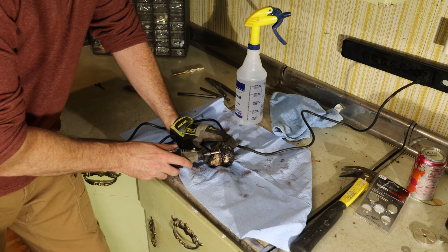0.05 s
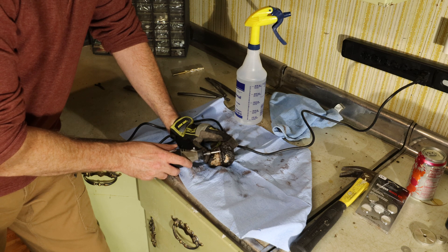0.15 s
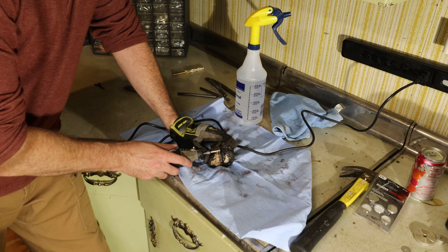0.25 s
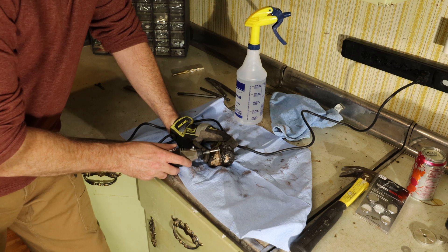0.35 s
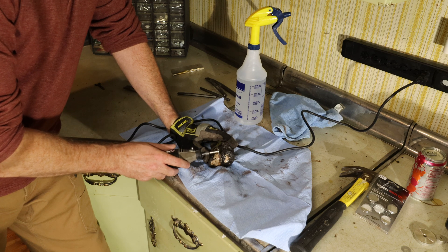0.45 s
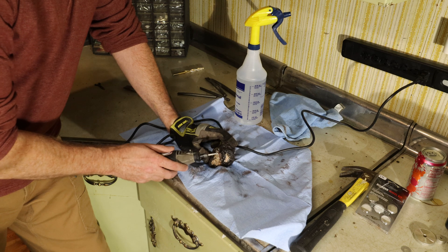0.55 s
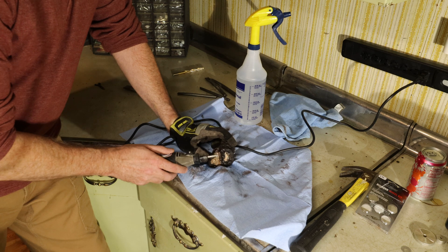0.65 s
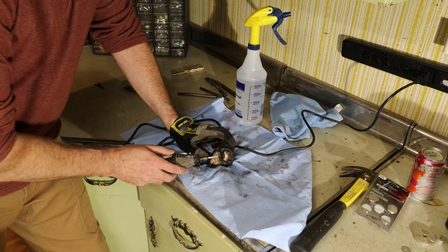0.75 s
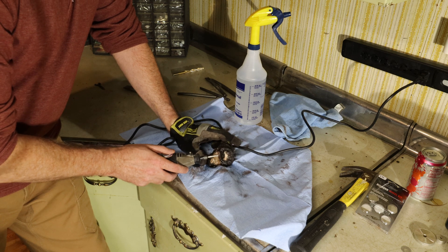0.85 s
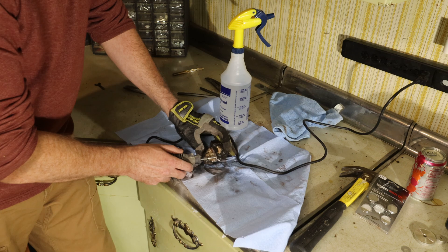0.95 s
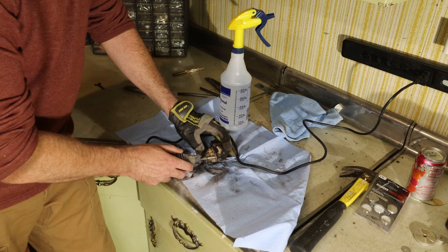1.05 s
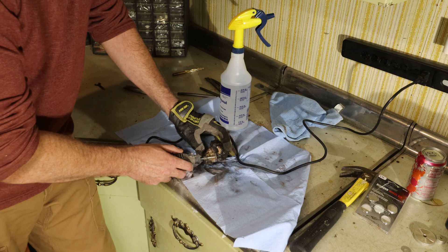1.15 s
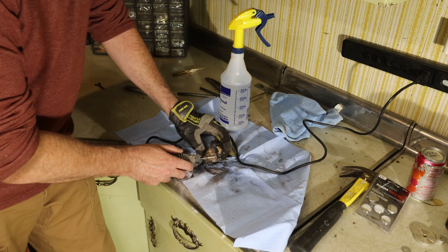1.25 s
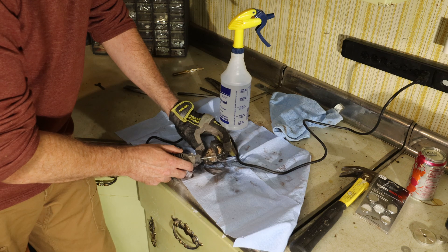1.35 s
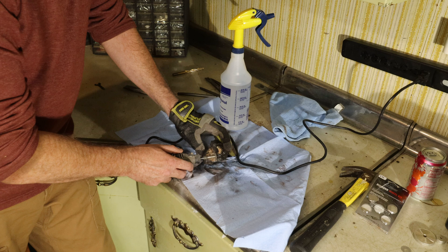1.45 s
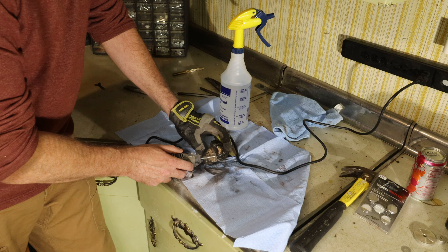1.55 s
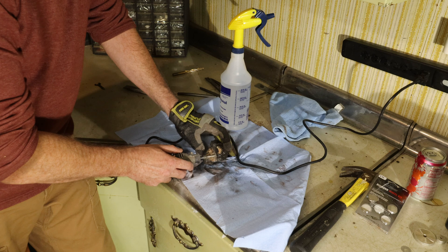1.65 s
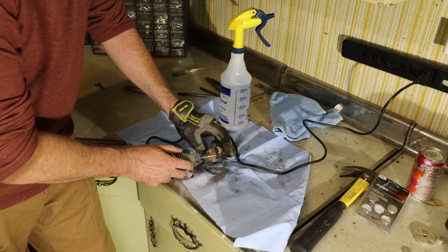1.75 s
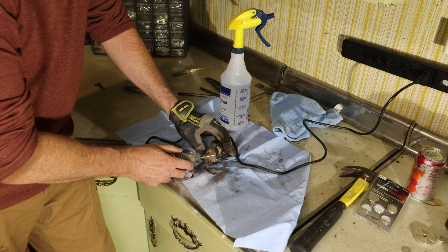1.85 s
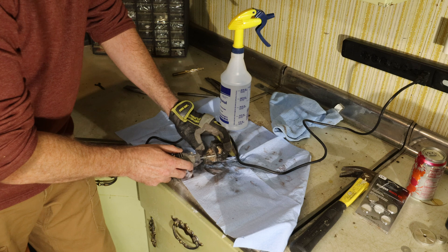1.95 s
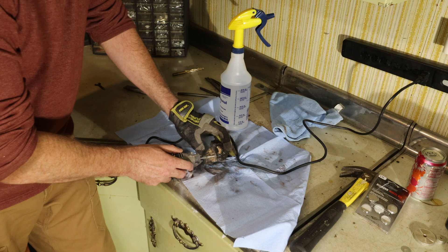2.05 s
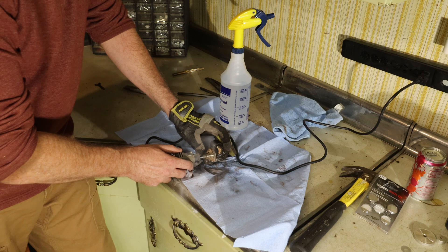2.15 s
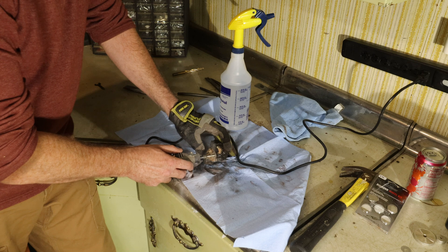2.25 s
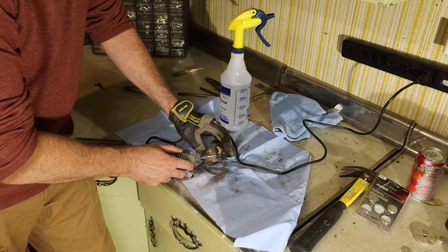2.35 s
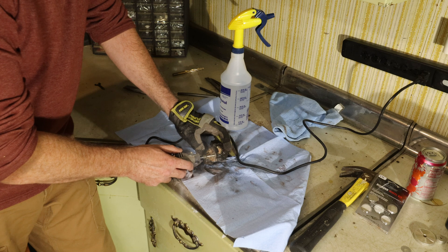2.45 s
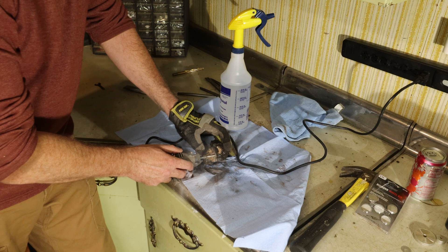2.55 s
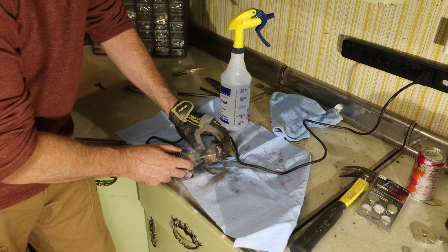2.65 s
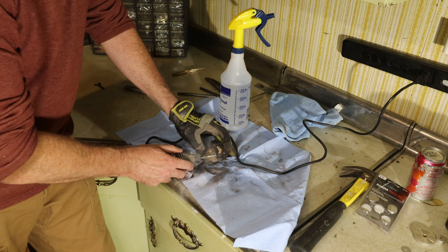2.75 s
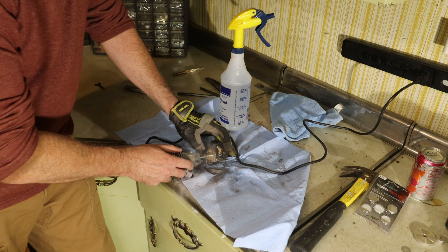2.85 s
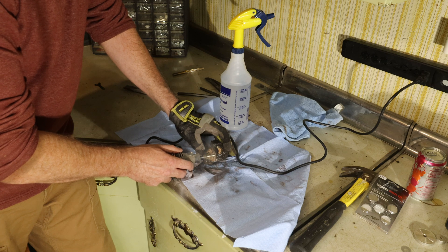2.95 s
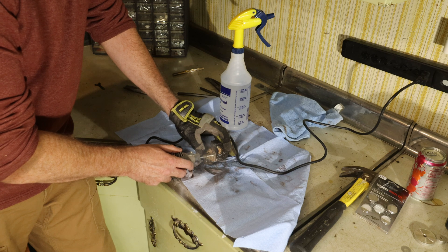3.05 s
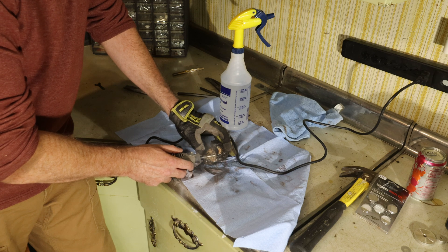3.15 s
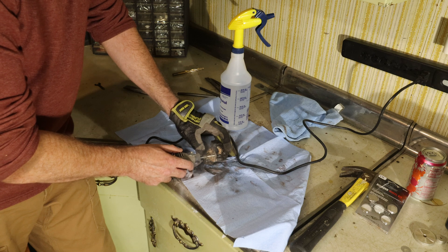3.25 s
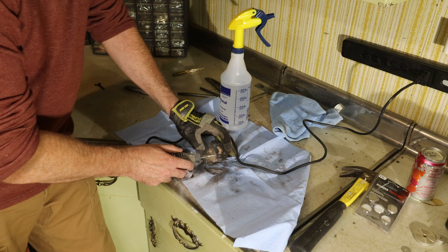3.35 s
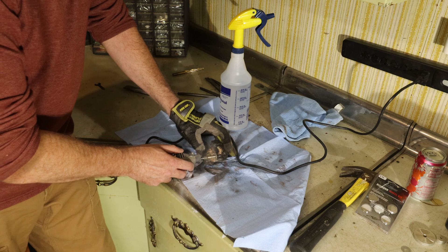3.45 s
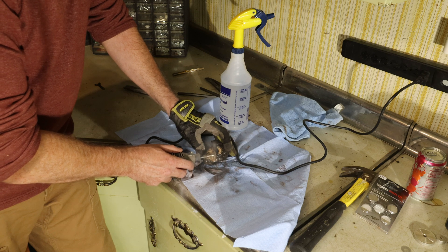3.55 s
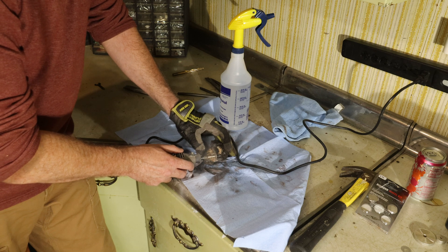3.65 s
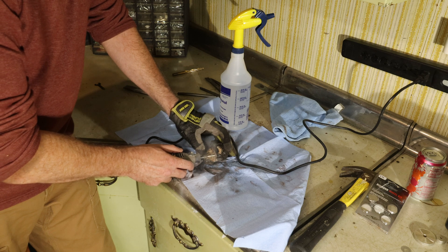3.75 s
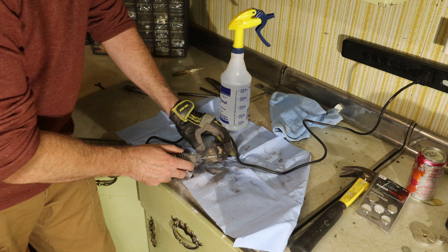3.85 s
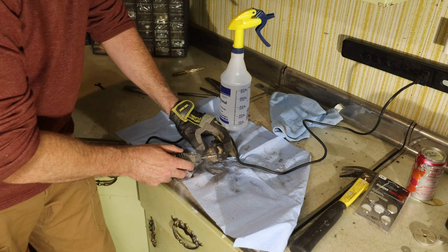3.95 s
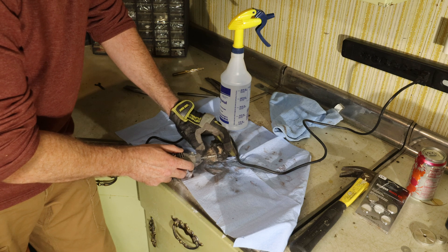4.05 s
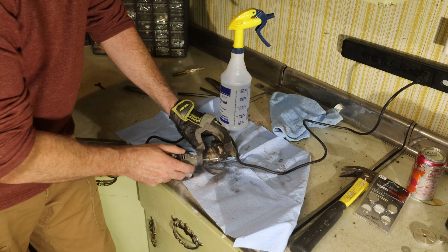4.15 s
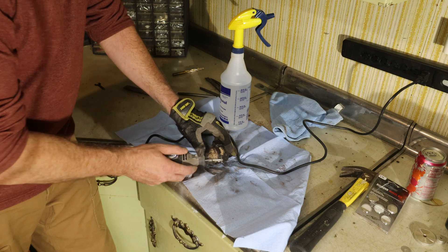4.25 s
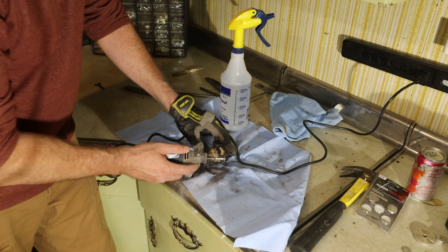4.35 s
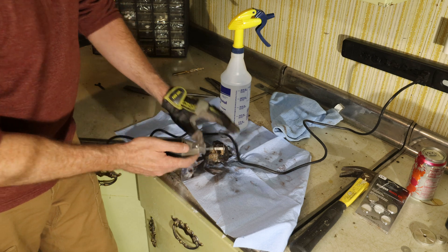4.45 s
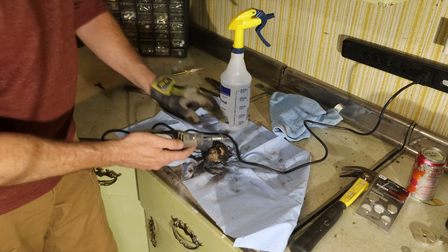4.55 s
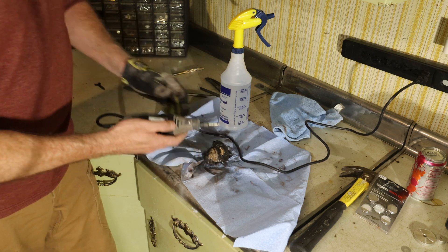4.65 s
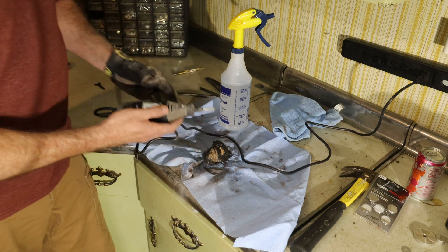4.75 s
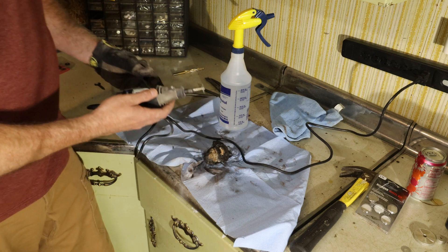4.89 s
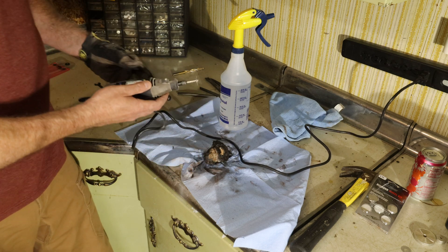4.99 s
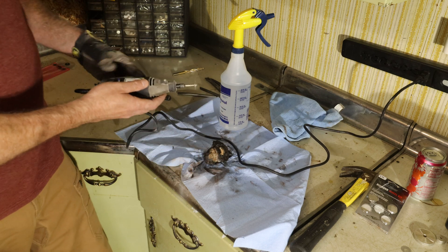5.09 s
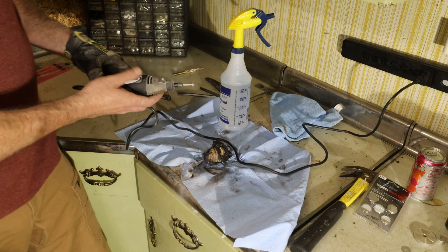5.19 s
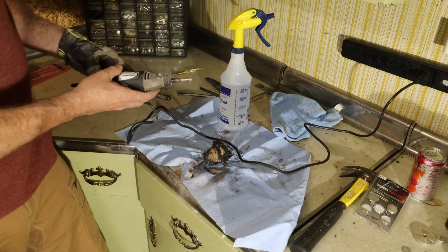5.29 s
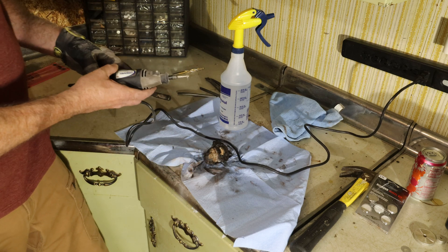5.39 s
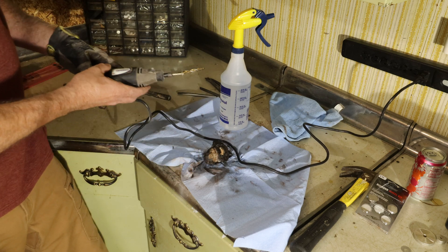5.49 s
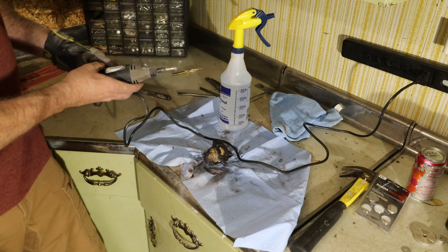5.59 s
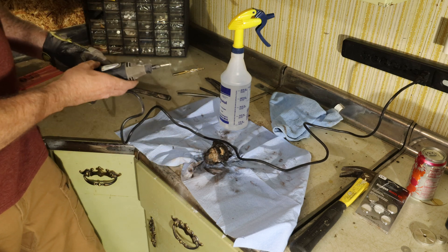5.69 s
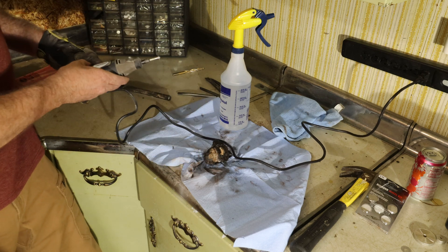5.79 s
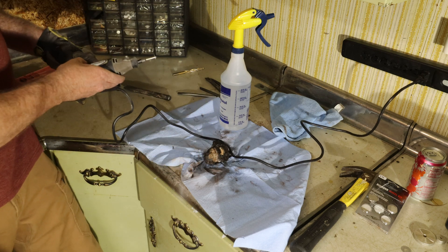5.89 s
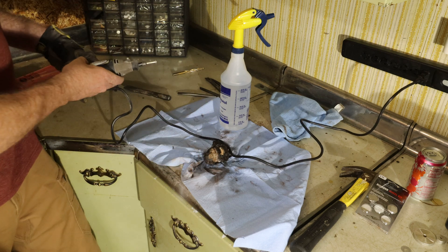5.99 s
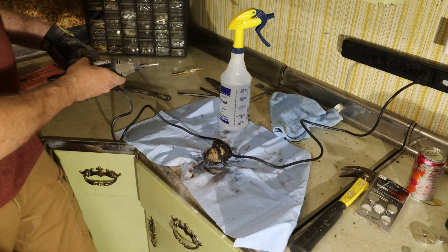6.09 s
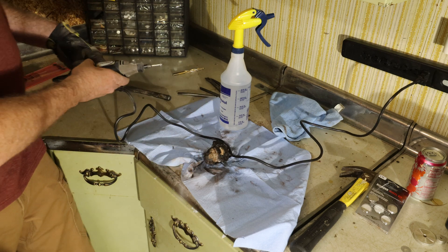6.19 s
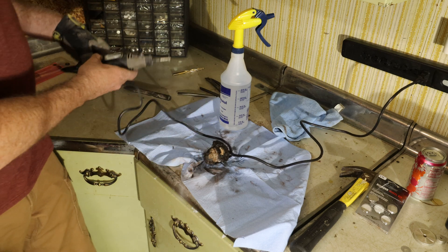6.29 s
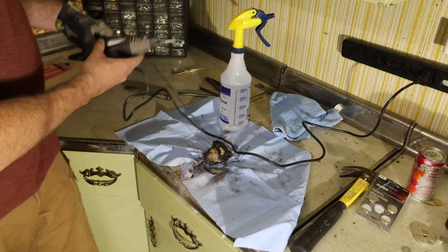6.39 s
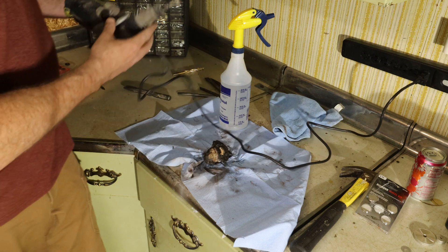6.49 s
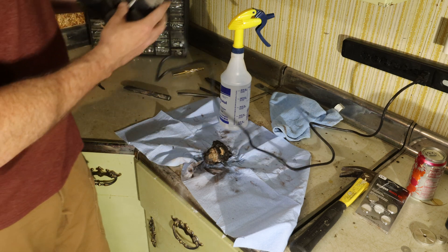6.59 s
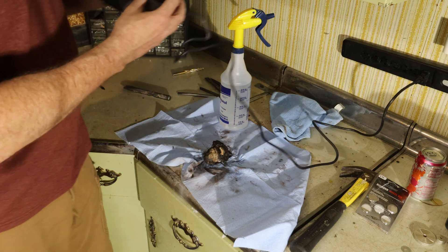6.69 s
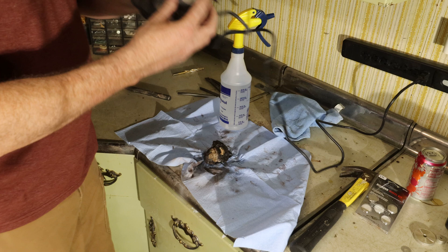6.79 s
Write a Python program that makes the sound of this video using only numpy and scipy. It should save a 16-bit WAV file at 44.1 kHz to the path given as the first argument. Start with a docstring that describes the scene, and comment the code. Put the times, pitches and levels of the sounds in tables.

```python
"""A small diamond wheel buzzes and grinds on stone, first in a shallow cut, then, past a short silence, in a long one.
Its high spot rubs once a turn, its diamonds scratch off gritty noise, and now and then it cracks or chatters.
The handheld mains-powered tool hums and whistles at multiples of its shaft speed, which sags under the load.
Lifted clear, it speeds up and rattles with fan and brush noise, then is switched off and coasts down in pitch."""
import sys
import numpy as np
from scipy import signal
from scipy.fft import rfft, irfft, next_fast_len
from scipy.io import wavfile
from scipy.ndimage import uniform_filter1d, map_coordinates

SR = 44100
rng = np.random.default_rng(int(sys.argv[2]) if len(sys.argv) > 2 else 0)


def materialize(psi):
    """Save the field psi as 16-bit PCM at rate SR to the path in sys.argv[1].

    A 1-D psi becomes a single channel; in a 2-D psi each row is a channel.
    """
    bounded = np.clip(np.atleast_2d(psi).T, -1, 1)
    quanta = np.round(bounded * 32767).astype(np.int16)
    wavfile.write(sys.argv[1], SR, quanta)


N = 301198
TIME = np.arange(N) / SR  # seconds
MAINS_HZ = 60
IDLE_HZ = 511.3  # free-running speed after the long cut, turns per second
OFF_S = 6.018  # the motor is switched off
# Wheel on stone in the long cut, levels before trims: start_s [s], rub_db, grind_db, dust_db, hum_db [dB]
LONG_CUT = [(1.05, -20.5, -28.5, -28.5, -39), (1.3, -16, -25.5, -25, -22), (1.5, -18, -26, -25.5, -27.5),
            (2.05, -19.5, -29, -29.5, -26), (2.5, -16, -25.5, -26.5, -24.5), (2.95, -17.5, -27, -28.5, -25),
            (3.35, -19.5, -28, -29, -24), (3.8, -21.5, -24, -29.5, -19), (4.1, -18, -25.5, -29, -22),
            (4.18, -19, -30, -35, -28.5)]
# The wheel bounces on every second turn: start_s [s], end_s [s], level_db [dB]
BOUNCES = [(3.053, 3.13, -29), (3.183, 3.295, -25), (3.412, 3.515, -25), (3.583, 3.686, -27.5),
           (3.797, 3.88, -29), (4.011, 4.1, -29)]
# The short silence: silent_from_s, silent_until_s, full_level_s [s]
DROPOUT = (.94, .977, .988)
# The lifted tool turns towards the listener and away; the end rows hold outside these times:
# time_s [s], hiss_change_db, rattle_change_db, drone_change_db [dB]
TURNING = [(4.2, -1.5, -3.5, -1), (4.8, 1, 0, 0), (5.25, 4, 1.5, 0), (5.6, 1.5, .3, 0.5),
           (5.8, -1.5, -3.5, 2), (6.1, -2.5, -2.5, -10)]


def amp(db):
    """Turn decibels into a gain."""
    return 10 ** (np.asarray(db) / 20)


def unit(x):
    """Scale to an average strength (rms) of 1."""
    return x / np.sqrt(np.mean(x ** 2) + 1e-20)


def along(points, hz):
    """Read a level in dB from (Hz, dB) points, evenly spaced in pitch."""
    point_hz, point_db = np.transpose(points)
    return np.interp(np.log(hz + 1), np.log(point_hz), point_db)


def curves(rows):
    """Join the rows of a table by straight lines into one curve for each column after the time."""
    time_s, *columns = np.transpose(rows)
    return [np.interp(TIME, time_s, column) for column in columns]


def wobble(rate):
    """A smooth random curve through rate random points a second."""
    coarse = TIME[::32]
    points = rng.standard_normal(int(TIME[-1] * rate) + 4)
    return np.interp(TIME, coarse, map_coordinates(points, [coarse * rate]))


def during(start, end, fade):
    """1 between two times, with sloping edges; full from the outset if it starts at 0."""
    rise = (TIME - start) / fade + .5 if start > fade else 1
    fall = (end - TIME) / fade + .5
    return np.clip(np.minimum(rise, fall), 0, 1)


def filtered(x, response):
    """Pass x through a gain that depends on frequency."""
    length = next_fast_len(N + SR // 4)
    gain = response(np.fft.rfftfreq(length, 1 / SR))
    return irfft(rfft(x, length) * gain, length)[:N]


def noise(colour, drive=1, patchy_db=0):
    """Coloured noise of rms 1, pulsed by drive, with patches in time and pitch that are stronger or weaker."""
    spectrum = signal.stft(drive * rng.standard_normal(N), nperseg=1024)[2]
    patches = uniform_filter1d(rng.standard_normal(spectrum.shape), size=5, axis=0)
    patches = uniform_filter1d(patches, size=9, axis=1)
    patchy = signal.istft(spectrum * amp(patchy_db * unit(patches)), nperseg=1024)[1][:N]
    return unit(filtered(patchy, lambda hz: amp(along(colour, hz))))


def recurring(x, speed, share):
    """The same diamonds pass again one and two turns later, gathering their noise around the shaft orders."""
    def earlier(turns):
        return map_coordinates(x, [np.arange(N) - turns * SR / speed])
    return unit(x + share * earlier(1) + share * share * earlier(2))


def mains_throb(depth):
    """The motor's torque pulses twice in each mains cycle."""
    return (1 + depth * np.cos(4 * np.pi * MAINS_HZ * TIME)) / np.sqrt(1 + depth ** 2 / 2)


def partial(angle, order, waver_db, rough, flutter=0):
    """One shaft order (a tone at order times the shaft speed), its phase fluttered by the torque pulses."""
    start, lag = rng.uniform(0, 2 * np.pi, 2)
    torque = np.cos(4 * np.pi * MAINS_HZ * TIME + lag)
    phase = order * angle + start + rough * wobble(70) + flutter * torque
    return np.sqrt(2) * amp(waver_db * wobble(24)) * np.sin(phase)


def buzz(speed, angle, colour, boost, waver_db, drift_db, rough, flutter, count):
    """One contact a turn: shaft orders slide under a fixed colour and flare up as they cross a resonance."""
    stack = np.zeros(N)
    for k in range(2, count):
        has_own_voice = k in (4, 6, 18)
        below_colour = k * speed.max() < colour[0][0]
        if has_own_voice or below_colour:
            continue
        level_db = along(colour, k * speed) + boost(k * speed) + drift_db * wobble(3.967)
        reach = min(k / 6, 1.3)  # a shake of the shaft moves high orders more than low ones
        stack += amp(level_db) * partial(angle, k, waver_db, rough * reach, flutter * reach)
    return unit(stack)


def resonance(modes, hz):
    """Boost in dB that a tone gets as it slides past each resonance."""
    coarse_hz = hz[::32]
    boost_db = sum(db * np.exp(-((coarse_hz - centre) / width) ** 2) for centre, width, db in modes)
    return np.interp(TIME, TIME[::32], boost_db)


def pressed_boost(hz):
    """Resonance of the wheel in the stone, in dB, shifting as the groove deepens."""
    # In the long cut: pitch_hz [Hz], half_width_hz [Hz], boost_at_start_db [dB], boost_at_end_db [dB]
    long_modes = np.array([(1215, 30, 5, 3.5), (1400, 64, 7, 0), (1627, 68, 10, 7), (1932, 55, 10.5, 0),
                           (2023, 31, 5, 7), (2180, 70, 2, 13), (2425, 55, 9, 10), (2550, 68, 18, 10),
                           (2900, 110, 7, 8), (2840, 45, 7, 4), (3554, 50, 10, 12), (4260, 130, 14, 3),
                           (4840, 20, 13, 1), (5750, 150, 6, 5), (7105, 140, 9, 5), (7750, 120, 10, 5)])
    # In the first, shallow cut: pitch_hz [Hz], half_width_hz [Hz], boost_db [dB]
    shallow_modes = [(847.5, 7.6, 10), (1678, 27, 17), (2086, 45, 11.5), (4180, 140, 15), (5830, 40, 17)]
    depth = np.interp(TIME, [LONG_CUT[0][0], LONG_CUT[-1][0]], [0, 1])
    entering = resonance(long_modes[:, [0, 1, 2]], hz)
    sunk = resonance(long_modes[:, [0, 1, 3]], hz)
    return np.where(TIME < DROPOUT[0], resonance(shallow_modes, hz), entering + depth * (sunk - entering))


def free_boost(hz):
    """Resonance of the tool in the air, in dB."""
    # pitch_hz [Hz], half_width_hz [Hz], boost_db [dB]
    free_modes = [(498.7, 12, 10.5), (985, 12, 5), (1015, 11, 8), (1913, 18, 9.5), (2006, 14, 9.5),
                  (2035, 9.4, 14.5), (2421, 38, 7.5), (2526, 13, 5.5), (3048, 10, 5), (3510, 22, 7),
                  (4490, 35, 7), (4570, 20, 4), (4060, 16, 3), (5075, 17, 3), (5550, 28, 10)]
    return resonance(free_modes, hz)


def switched_off():
    """0 while the motor is powered, rising to 1 within 0.18 s once the current is cut."""
    return np.clip((TIME - OFF_S) / .18, 0, 1)


def shaft_speed():
    """Turns per second: held down in each cut, recovering after it, and slowed evenly by friction once off."""
    # Speed in each cut: time_s [s], speed_hz [turns per second]
    first_speed = [(0, 416), (.22, 419), (.44, 425.4)]
    long_speed = [(0.98, 485.2), (1.18, 483.6), (1.55, 438.3), (1.9, 426.1), (1.98, 425.4), (2.14, 430.6),
                  (2.56, 406.7), (2.68, 414.0), (2.79, 399.1), (2.92, 408.6), (3.04, 399.1), (3.11, 406.7),
                  (3.23, 403.0), (3.37, 413.2), (3.42, 411.4), (3.59, 421.8), (3.73, 420.2), (3.8, 428.8),
                  (3.87, 424.5), (4.16, 443.9)]
    first_idle_hz, recover_s, brake_hz_per_s = 469.7, .46, 338

    def cut_and_lift(cut, idle_hz):
        lifted_s = np.maximum(TIME - cut[-1][0], 0)
        return idle_hz + (curves(cut)[0] - idle_hz) * np.exp(-lifted_s / recover_s)
    before_silence = cut_and_lift(first_speed, first_idle_hz)
    after_silence = cut_and_lift(long_speed, IDLE_HZ)
    powered = np.where(TIME < DROPOUT[1], before_silence, after_silence)
    return powered - brake_hz_per_s * np.maximum(TIME - OFF_S, 0)


def contact(first, second):
    """Gains of rubbing, grinding, dust and hum while the wheel touches the stone."""
    # The shallow cut, levels before trims: time_s [s], rub_db, grind_db, dust_db, hum_db [dB]
    first_cut = [(0, -24.5, -22, -29.5, -33.5), (.2, -23.5, -24, -29.5, -29.5), (.29, -22.5, -26, -30, -28),
                 (.315, -27, -22, -30, -38), (.35, -26, -17, -29, -41), (.385, -29, -24, -30, -40),
                 (.44, -27, -21, -27, -42)]
    return [first * amp(a) + second * amp(b) for a, b in zip(curves(first_cut), curves(LONG_CUT))]


def rattling(speed, load):
    """Gain of the spindle rattle: it grows steeply near idle speed and is damped by the cut."""
    # 0.25 dB is lost for every turn per second below idle, down to a floor
    free_db = np.maximum(-13.5 - 0.25 * (IDLE_HZ - speed), -29)
    return amp(free_db - 8.8 * load - 7.5 * switched_off())


def cutting(speed, angle, first, second):
    """The wheel's high spot rubs each turn and its diamonds scratch off grit, more with each push or bounce."""
    # Colours of the rubbing buzz, its treble, the grinding and the dust hiss: pitch_hz [Hz], level_db [dB]
    rub_colour, sizzle_colour = [(1300, -6), (2000, -1.5), (2700, -4), (3400, -2), (4300, -4.5),
                                 (5700, -6.5), (7000, -8.5)], [(5800, -16), (6800, 6), (7800, -2), (9500, -7), (11000, 0),
                                              (11800, 1.5), (13200, 3), (14500, 0), (16000, -5)]
    grind_colour, dust_colour = [(30, -61), (110, -20), (165, -15.5), (280, -24), (450, -11.5), (800, -7),
                                 (1400, -6.5), (2100, 1.5), (2700, -3), (3600, -0.5), (4600, -2.5),
                                 (5900, -2.5), (7500, -20), (12000, -60)], [(2500, -54), (5200, -24), (6400, -5.5), (7800, 3.5),
                                                (9500, -0.5), (11800, -3), (13000, 3.5), (14200, 0),
                                                (16000, -10)]
    # The hand pushes the wheel harder into the stone: start_s [s], end_s [s], extra_grit_db [dB]
    hand_pushes = [(1.28, 1.564, 5), (1.697, 1.914, 4.5), (2.165, 2.335, 6), (2.7, 2.793, 5.5)]

    rub, grind, dust, _ = contact(first, second)
    push_db = sum(db * during(start, end, 0.083) for start, end, db in hand_pushes)
    push_db = push_db + 3 * sum(during(start, end, 0.034) for start, end, _ in BOUNCES)
    grind = grind * amp(push_db)
    dust = dust * amp(0.54 * push_db)  # the dust gains about half as many dB

    pressure = amp(1.17 * wobble(35))
    once_a_turn = 1 + 0.32 * np.cos(angle)
    bite = once_a_turn * amp(0.8 * wobble(160)) * mains_throb(0.062)
    shaken = angle + 0.0073 * wobble(120)
    tone = buzz(speed, shaken, rub_colour, pressed_boost,
                waver_db=2.6, drift_db=1.1, rough=0.18, flutter=0.13, count=17)
    sizzle = buzz(speed, shaken, sizzle_colour, pressed_boost,
                  waver_db=3.4, drift_db=1.5, rough=0.33, flutter=.15, count=39)
    grit = recurring(noise(grind_colour, bite, patchy_db=2), speed, share=0.2)
    powder = recurring(noise(dust_colour, bite, patchy_db=3.5), speed, share=.3)
    rubbing = amp(-1.0) * rub * tone
    dusting = dust * (amp(-2.0) * sizzle + powder)
    return pressure * (rubbing + grind * grit + dusting)


def unbalance_hum(speed, angle, first, second):
    """The unbalanced wheel hums once a turn; pressed on the stone it also knocks, adding an octave."""
    _, _, _, pressed_hum = contact(first, second)
    load = first + second
    stutter_db = 1.9 * during(2.9, 4.16, .1) * wobble(28)  # the wheel grabs and slips late in the cut
    free_hum = amp(-38.5 + 5 * switched_off() + free_boost(speed))
    free_hum = free_hum / (1 + (362 / speed) ** 24)  # dies away below 362 turns per second
    hum = (pressed_hum + (1 - load) * free_hum) * amp(stutter_db)
    hum = hum * partial(angle, order=1, waver_db=1.0, rough=0.057, flutter=0.025)
    octave = pressed_hum * amp(-6.5 + 4 * first)  # stronger in the shallow cut
    return hum + octave * partial(angle, order=2, waver_db=2.8, rough=.15, flutter=.05)


def drone_and_ring(speed, angle, first, second):
    """The rub or the rattle shakes the housing (order 4) and wheel (order 6): steady when free, trembling in use."""
    load = first + second
    rub = contact(first, second)[0]
    rattle = rattling(speed, load)

    def driven(pressed_db, free_db, order):
        pressed = rub * amp(pressed_db + pressed_boost(order * speed))
        free = rattle * amp(free_db + free_boost(order * speed))
        return np.hypot(pressed, free)
    loose = load + 1.8 * during(6.02, 6.7, 0.033)  # the shaft also shudders when the current is cut
    shaken = angle + 0.02 * loose * wobble(90)
    drone = driven(-14.5, -13 + curves(TURNING)[2], order=4) * amp(1.7 * loose * wobble(55))
    drone = drone * partial(shaken, order=4, waver_db=1.6, rough=.04, flutter=0.11)
    ring = driven(-15.5, -16.5, order=6) * amp(1.7 * loose * wobble(55))
    ring = ring * partial(shaken, order=6, waver_db=2.6, rough=0.065, flutter=0.26)
    return drone + ring


def motor_whistle(angle, load):
    """The motor whistles at order 18, weaker under load and coasting; a lower one joins as the shaft runs down."""
    # It swells as the tool is turned in the hand, and in the long cut (1.66-2.33 s) as order 18 passes a
    # resonance of the wheel pressed in the stone: start_s [s], end_s [s], boost_db [dB]
    whistle_swells = [(.65, .96, 5), (1.66, 2.33, 10.5), (1.68, 1.95, 8), (5.35, 5.575, 11.5)]
    off = switched_off()
    swell_db = sum(db * during(start, end, 0.081) for start, end, db in whistle_swells)
    level_db = -35 - 6.5 * load - 2.5 * off + swell_db + 3.3 * off * wobble(45)
    shaken = angle + .04 * off * wobble(150)
    whistle = amp(level_db) * partial(shaken, order=18, waver_db=3.5, rough=0.28, flutter=.15)
    lower = amp(-49.5) * off * partial(angle, order=16, waver_db=4, rough=.6)
    return whistle + lower


def spindle_rattle(speed, angle, load):
    """The spindle rattles at many shaft orders, loudest near idle speed and damped by the cut."""
    # pitch_hz [Hz], level_db [dB]
    rattle_colour = [(500, -17), (880, 0.5), (1000, -3), (1500, 3.5), (2500, 1), (3500, 3), (4500, -4.5),
                     (5600, -3.5), (7000, -17), (10000, -18), (16000, -30)]
    facing_db = curves(TURNING)[1]
    orders = buzz(speed, angle, rattle_colour, free_boost,
                  waver_db=1.6, drift_db=1.76, rough=.09, flutter=0.58, count=28)
    shudder_db = 2.2 * during(6.02, 6.2, .03) * wobble(60)
    return rattling(speed, load) * amp(-1.2 + facing_db + shudder_db) * orders * mains_throb(0.12)


def fan_and_brushes(speed, angle, load):
    """The fan blows and the brushes hiss, pulsing once a turn and with the mains, louder with speed."""
    # Colours of the fan and the brushes: pitch_hz [Hz], level_db [dB]
    air_colour, hiss_colour = [(30, -38), (200, -29), (400, -14), (700, -12), (1150, 2.5), (1800, -2.5),
                               (2600, -1.5), (3500, 0.5), (4400, -7), (5700, -3), (7500, -21), (12000, -53)], [(2500, -50), (5200, -6), (6300, 1), (7500, 0), (9000, -3),
                                            (11000, -5.5), (13000, -6.5), (16000, -13.5)]
    sag, off = IDLE_HZ - speed, switched_off()
    moved_db = curves(TURNING)[0]
    pulsing = (1 + 0.29 * np.cos(angle)) * mains_throb(0.072) * amp(0.83 * wobble(40))
    air_db = -24 - 0.03 * sag - 1.2 * load - 2.5 * off + .3 * moved_db
    hiss_db = -30.5 - .02 * sag - 3.5 * load - 4.2 * off + moved_db
    air = amp(air_db) * noise(air_colour, pulsing, patchy_db=2.5)
    return air + amp(hiss_db) * noise(hiss_colour, pulsing, patchy_db=2.5)


def mains_buzz(angle, first):
    """In the first cut, twice the mains rate sounds by itself and on both sides of the shaft tone."""
    mains = 4 * np.pi * MAINS_HZ * TIME
    sides = amp(-39) * np.sin(angle + mains) + amp(-49.5) * np.sin(angle - mains)
    return first * during(0, 0.333, .04) * (amp(-47) * np.sin(mains) + sides)


def workshop():
    """Low room noise, mains hum and a faint rumble as the tool is carried off."""
    # pitch_hz [Hz], level_db [dB]
    room_colour = [(20, 0), (60, -4), (100, 1), (300, -6), (2000, -18), (16000, -50)]
    rumble = amp(-53) * during(6.68, 7.9, .08) * noise([(20, -5), (45, 0), (90, -16), (300, -50)])
    hum = amp(-59) * np.sin(2 * np.pi * MAINS_HZ * TIME)
    return amp(-64.5) * noise(room_colour) + hum + rumble


def snags():
    """Short dull cracks as the wheel catches on an edge: noise bursts that start at once and die in milliseconds."""
    # time_s [s], strength_db [dB, before the colour and a final trim]
    snag_times = [(0.321, -1), (0.337, -5), (0.341, 1.5), (0.349, 5), (0.353, -16), (0.365, -3),
                  (0.374, -3), (0.387, -1), (0.413, -3), (3.602, 4), (3.811, 1)]
    # pitch_hz [Hz], level_db [dB]
    stone_colour = [(30, -70), (90, -36), (160, -9), (280, -17.5), (700, -2.5), (1700, -2), (3200, -3),
                    (6000, -14), (9000, -17), (16000, -18)]
    # Each crack starts at once and falls 60 dB in 34 ms; TIME >= s keeps it silent before
    blows = sum(amp(db) * (TIME >= s) * amp(-60 * np.abs(TIME - s) / 0.034) for s, db in snag_times)
    return amp(-3.5) * filtered(blows * rng.standard_normal(N), lambda hz: amp(along(stone_colour, hz)))


def cage_growl(angle):
    """Side load makes the bearing cage drone at about a third of the shaft speed."""
    # start_s [s], end_s [s], level_db [dB]
    growl_spells = [(1.2, 1.5, -59), (1.778, 2.45, -55)]
    level = sum(amp(db) * during(start, end, .08) for start, end, db in growl_spells)
    return level * partial(angle, order=4 / 11, waver_db=3, rough=0.22)


def chatter(angle):
    """Bouncing every other turn puts tones halfway between the shaft orders."""
    level = sum(amp(db) * during(start, end, 0.033) for start, end, db in BOUNCES)
    lines = sum(amp(-8 * np.log10(k)) * partial(angle, k + .5, waver_db=2.5, rough=.5) for k in range(1, 16))
    low = partial(angle, order=1 / 2, waver_db=2.5, rough=0.98)
    return level * (unit(lines) + amp(-26) * low)


def scene():
    """One shaft drives the tool and the wheel; the sound is the same in both ears."""
    first, second = during(0, 0.443, 0.05), during(0.93, 4.17, 0.039)  # the two cuts
    load = first + second
    speed = shaft_speed() * (1 + 0.00079 * load * wobble(25.06))
    angle = 2 * np.pi * np.cumsum(speed) / SR
    stone = cutting(speed, angle, first, second) + snags() + chatter(angle)
    tones = unbalance_hum(speed, angle, first, second) + drone_and_ring(speed, angle, first, second)
    tones = tones + motor_whistle(angle, load) + mains_buzz(angle, first) + cage_growl(angle)
    motor = spindle_rattle(speed, angle, load) + fan_and_brushes(speed, angle, load)
    return np.tile(stone + tones + motor + workshop(), (2, 1))


def record(dry):
    """Round the peaks, drop to silence once, briefly, and remove everything above 15950 Hz."""
    stop, resume, full = DROPOUT
    gate = np.interp(TIME, [stop - .001, stop, resume, full], [1, 0, 0, 1])
    rounded = dry / (1 + np.abs(dry / .95) ** 8) ** (1 / 8)
    return np.array([filtered(x, lambda hz: hz < 15950) for x in rounded * gate])


dry = scene()
out = record(dry)
materialize(out)
```